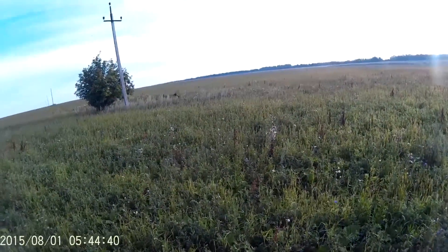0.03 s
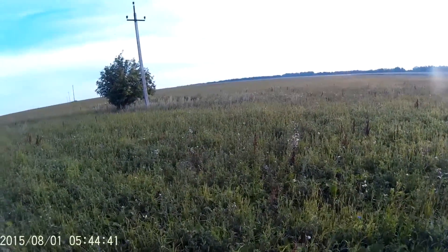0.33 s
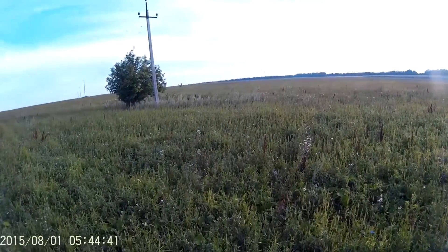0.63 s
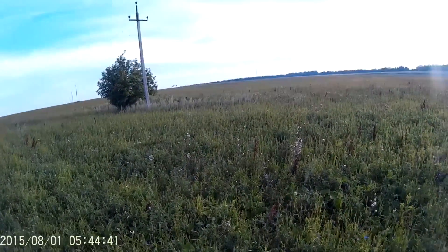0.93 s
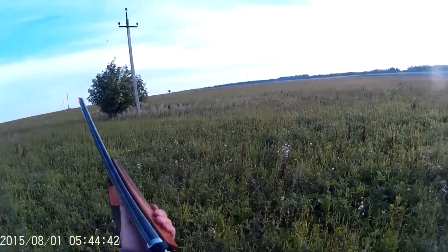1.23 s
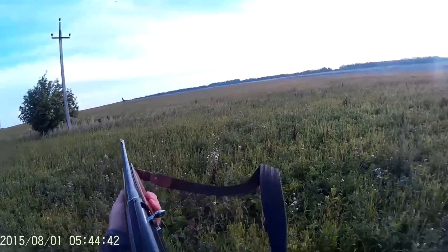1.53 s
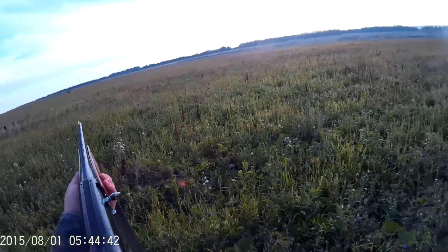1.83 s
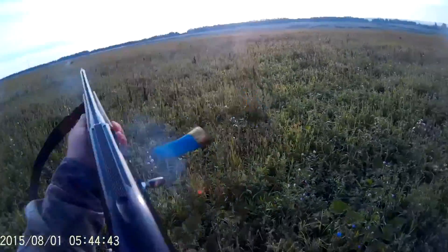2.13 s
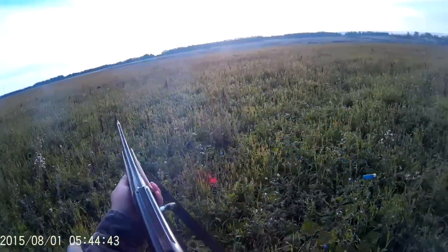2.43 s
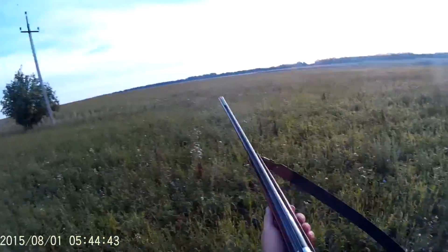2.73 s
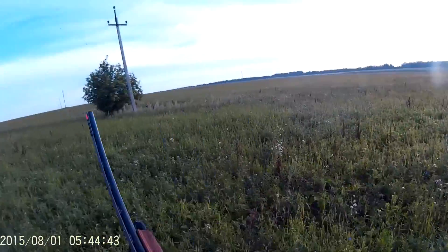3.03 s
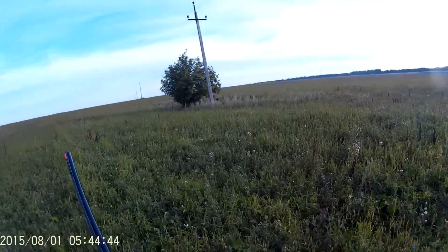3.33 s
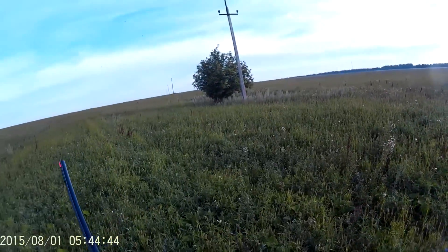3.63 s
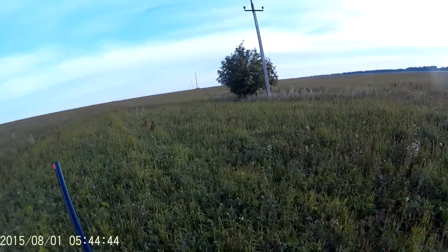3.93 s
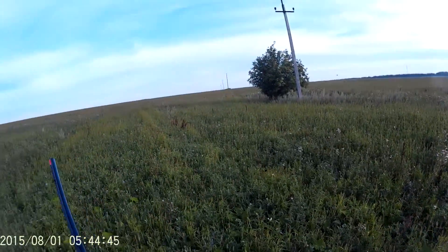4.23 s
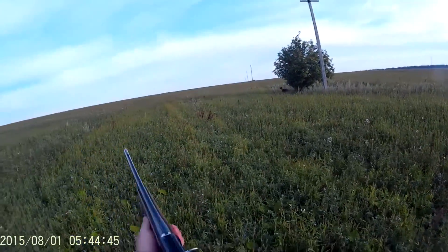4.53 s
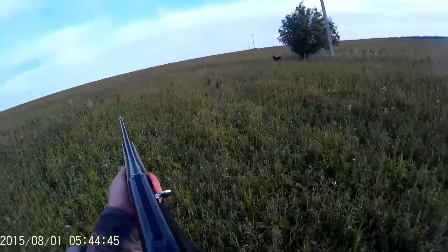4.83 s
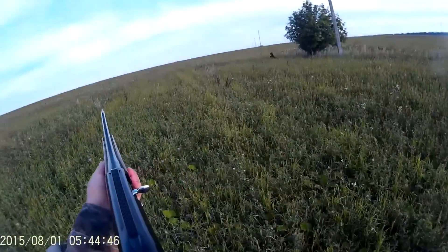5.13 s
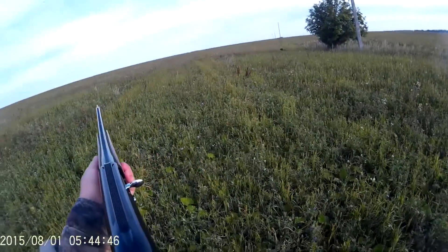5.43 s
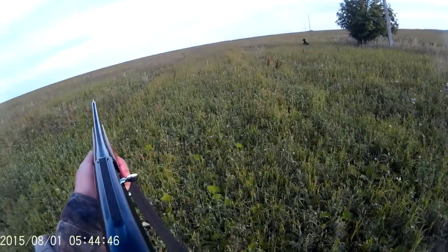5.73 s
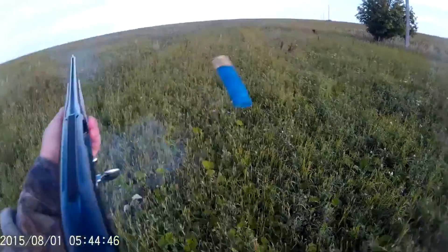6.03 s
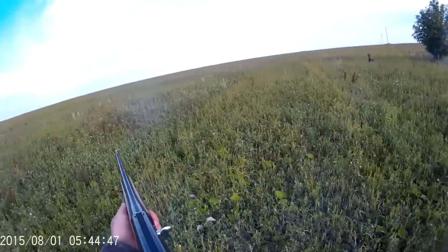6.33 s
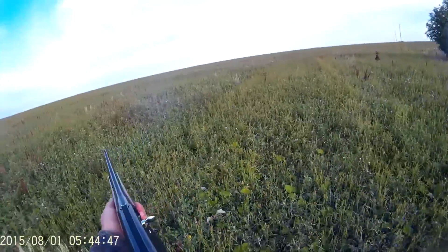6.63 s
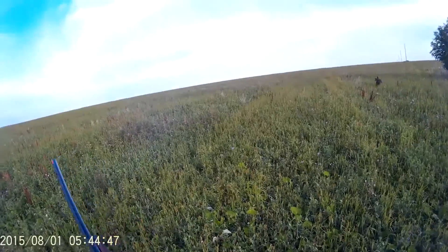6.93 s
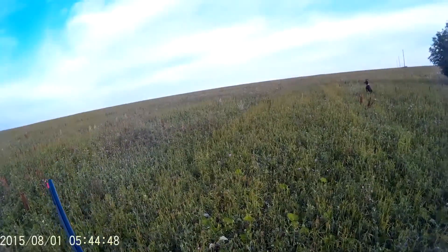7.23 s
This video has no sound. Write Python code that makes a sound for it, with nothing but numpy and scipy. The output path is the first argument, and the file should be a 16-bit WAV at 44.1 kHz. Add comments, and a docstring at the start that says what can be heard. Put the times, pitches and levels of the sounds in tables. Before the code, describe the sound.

Two loud, close shotgun blasts about four seconds apart in an open field, each followed by a quick metallic bolt clack.

```python
"""Two shotgun shots in a meadow

Open grass, still air; a small camera on the shooter's head, about a metre behind a self-loading gun.
Each muzzle blast rings the camera case and overloads the microphone. Grass and field scatter a short
tail, the recoil thumps, and the bolt clatters shut an eighth of a second later. Around the shots,
close in: soft bumps of the camera and brushing sleeves, over a faint rumble and hiss."""
import sys
import numpy as np
from scipy import signal
from scipy.fft import rfft, irfft
from scipy.io import wavfile

SR = 44100
rng = np.random.default_rng(int(sys.argv[2]) if len(sys.argv) > 2 else 0)


def to_wav(sig):
    """Store sig (one row per channel, or 1-D mono) as 16-bit WAV at the path in sys.argv[1].

    Samples outside -1..1 are clipped; the rate is SR.
    """
    pcm = np.clip(np.atleast_2d(sig), -1, 1) * 32767
    pcm = np.round(pcm).astype(np.int16)
    wavfile.write(sys.argv[1], SR, pcm.T)  # frames by channels


N = 329427
T = np.arange(N) / SR


# The shots, from just behind the gun: (time [s], blast [dB], bark centre [Hz], crack centre [Hz],
# scatter [dB], recoil thump [dB], shudder [dB])
GUNSHOTS = [(2.0534, 4, 1551, 5962, -20, -24.5, -9), (5.9397, 2, 1216, 3884, -19.5, -18, -5.5)]
def shotgun(push_ms=.7, lead_s=.0048, jolt_db=-13, jolt_hz=1280, hiss_db=-32, kick_s=.0043):
    """Firing jolts the gun while the charge is still in the barrel; then come blast, scatter and recoil."""
    out, t = np.zeros(N), T[:SR]
    for s, blast_db, bark_hz, crack_hz, scatter_db, thump_db, shudder_db in GUNSHOTS:
        jolt = undb(jolt_db) * resonate(shock(t, push_ms), jolt_hz, width_hz=220)
        hiss = undb(hiss_db) * colour(noise(len(t)) * fade(t, t60=.06), STEEL_SCRAPE)
        add(out, s - lead_s, jolt + hiss)
        add(out, s, undb(blast_db) * muzzle(t, push_ms, bark_hz, crack_hz))
        add(out, s, undb(scatter_db) * meadow(t))
        add(out, s + kick_s, recoil(t, thump_db, shudder_db))
    return out


def muzzle(t, push_ms, bark_hz, crack_hz, ahead_s=.00075, ground_s=.0063, low_cut_hz=160):
    """A small snap of gas runs ahead of the charge; the blast swings the other way, barks and cracks."""
    snap = undb(-14) * shock(t, push_ms=.3)
    blast = -shock(t - ahead_s, push_ms)
    bounce = -undb(-17) * shock(t - ahead_s - ground_s, push_ms)
    bounce = colour(bounce, [(1500, -1), (6000, -14)])  # the ground bounce loses treble in the grass
    wave = snap + blast + bounce
    bark = undb(-1) * resonate(wave, bark_hz, width_hz=1000)
    crack = undb(1) * resonate(wave, crack_hz, width_hz=600)
    return signal.sosfilt(signal.butter(1, low_cut_hz, "high", fs=SR, output="sos"), wave + bark + crack)


def shock(t, push_ms):
    """Blast wave: a sudden overpressure that falls through zero into a longer suction."""
    age = np.maximum(t, 0) * 1000 / push_ms
    return (t >= 0) * (1 - age) * np.exp(-age)


# Echoes off the grass nearby and off the field farther out: (frequency [Hz], level [dB])
NEAR_GRASS = [(100, -7.5), (300, -1), (550, 1.5), (850, 3.5), (1100, -1), (1500, 2), (2100, 1.5),
              (3700, -3.5), (5500, -8.5), (7000, -13.5), (11000, -16.5), (13000, -28.5), (16000, -36.5)]
DISTANT_FIELD = [(60, 10.5), (200, 12), (450, 10.5), (900, 2), (2000, 1), (4000, -7), (7000, -14),
                 (11000, -19.5), (14000, -34.5)]
def meadow(t, near_t60=.125, far_t60=.5, far_db=-23, build_s=.002453):
    """Grass close by throws back a bright spray of echoes; the field beyond answers longer and duller."""
    near = colour(grains(len(t), spread_db=2.5) * fade(t, near_t60), NEAR_GRASS)
    far = colour(grains(len(t), spread_db=1.5) * fade(t, far_t60), DISTANT_FIELD)
    return (near + undb(far_db) * far) * (1 - np.exp(-t / build_s))


# The recoil's shudder at the head mount: (frequency [Hz], level [dB])
MOUNT_SHUDDER = [(15, -2), (35, 2.5), (70, -0.5), (105, -18.5), (220, -18.5), (500, -44.5), (2000, -80)]
def recoil(t, thump_db, shudder_db, swing_hz=55, shudder_t60=.47):
    """The kick swings the camera; it shudders on as the shooter settles."""
    shudder = colour(noise(len(t)), MOUNT_SHUDDER) * fade(t, shudder_t60)
    return undb(shudder_db) * shudder - undb(thump_db) * rock(t, swing_hz, rise_s=.0071)


# The bolt slams home, just in front of the microphone: (time [s], level [dB], treble [dB])
BOLT_SLAMS = [(2.172, -34, 2), (6.0600, -32.5, 0.5)]
# Shell rides up the ramp, bolt slams, lock drops in, gun settles:
# (time from the slam [s], level [dB], treble [dB])
BOLT_STROKE = [(-.006, -5, -3), (0, -1, 1), (0.0112, -.5, -6), (.083, -23, -12)]
# Lone clinks: the ejector striking the shell, then the shell latch: (time [s], level [dB], treble [dB], latch
# ring [dB])
LONE_CLINKS = [(2.1048, -34.5, -10.5, 13.5), (2.2170, -47.5, 0, 0), (6.1263, -41, -2.5, 10)]
def gun_action():
    """The bolt makes the same stroke after each shot and shakes the latch; the ejector and the latch also clink
    by themselves."""
    out = np.zeros(N)
    for s, db, treble_db in BOLT_SLAMS:
        for after_s, knock_db, tilt_db in BOLT_STROKE:
            clack = knock(scrape_s=.0067, treble_db=treble_db + tilt_db, latch_db=-6)
            add(out, s + after_s, undb(db + knock_db) * clack)
    for s, db, treble_db, latch_db in LONE_CLINKS:
        add(out, s, undb(db) * knock(scrape_s=.003, treble_db=treble_db, latch_db=latch_db))
    return out


# Steel scraping on steel, close up: (frequency [Hz], level [dB])
STEEL_SCRAPE = [(100, -7), (600, -6), (1000, 0), (1500, -5.5), (2200, -2.5), (3700, -8.5), (6000, -13.5),
                (11000, -18.5), (13000, -32), (16000, -39.5)]
# Modes of the receiver and barrel, and of the small shell latch: (frequency [Hz], t60 [s], level [dB])
RECEIVER_MODES = [(1073, 0.037, 0.5), (1530, 0.045, 2), (2600, 0.044, 8), (2906, .04, 5), (3910, .04, 1),
                  (4560, .03, 6), (5754, .03, 4)]
LATCH_MODES = [(3070, .02, 1), (3860, 0.023, 2), (7430, .015, 5.5)]
def knock(scrape_s, treble_db, latch_db, receiver_db=-2, field_db=-22, field_t60=.14, bite_s=.00051):
    """A brief gritty scrape with a faint tail rings the receiver and the latch."""
    t = T[:SR // 4]
    envelope = np.exp(-(t / scrape_s) ** 4) + undb(field_db) * fade(t, field_t60)
    force = grains(len(t), spread_db=1.3) * envelope * (1 - np.exp(-t / bite_s))
    contact = colour(colour(force, STEEL_SCRAPE), [(1500, 0), (6000, treble_db)])
    receiver = undb(receiver_db) * ring(contact, RECEIVER_MODES)
    latch = undb(latch_db) * ring(contact, LATCH_MODES)
    return contact + receiver + latch


# The camera rocks on its strap as the shooter shifts weight: (time [s], level [dB], rise [s])
CAMERA_BUMPS = [(0.269, -47.5, 0.038), (.84, -56, .05), (1.075, -48.5, 0.016), (1.175, -48, 0.02),
                (4.624, -38.5, 0.017), (4.70, -51.5, 0.034)]
# The arms raise or lower the gun: (mid time [s], sleeve [dB], treble [dB], camera sway [dB])
ARM_SWINGS = [(1.5, -75, -1, -62), (2.613, -80.5, 15.5, -79.5), (4.76, -71, -7, -64)]
# The sling scuffs, a shell drops into the grass: (time [s], level [dB], half length [s], treble [dB])
SHORT_SCUFFS = [(1.571, -58.5, .004, -3), (2.524, -74, .005, 17), (4.738, -75, .018, 15)]
def handling(strap_hz=31.7, sway_width_hz=16, drag_db=-56, drag_db_per_db=.3, drag_lag_s=.08):
    """Bumps rock the camera and drag the jacket; swings brush the sleeves and sway the camera."""
    out, drag = np.zeros(N), np.zeros(N)
    for s, db, rise_s in CAMERA_BUMPS:
        add(out, s, undb(db) * rock(T[:SR], strap_hz, rise_s))
        drag += undb(drag_db + drag_db_per_db * db) * swell(s + drag_lag_s, half_s=.066)
    sway = resonate(resonate(noise(), strap_hz, sway_width_hz), strap_hz, sway_width_hz)
    for s, sleeve_db, treble_db, sway_db in ARM_SWINGS:
        out += undb(sleeve_db) * brush(swell(s, half_s=.16), treble_db)
        out += undb(sway_db) * swell(s, half_s=.28) * sway / np.std(sway)
    for s, db, half_s, treble_db in SHORT_SCUFFS:
        out += undb(db) * brush(swell(s, half_s), treble_db)
    return out + brush(drag, treble_db=-3.5)


# Jacket cloth just below the microphone: (frequency [Hz], level [dB])
JACKET_RUB = [(100, 8), (300, 19.5), (800, 6), (1400, -7), (2000, -4.5), (4000, -24), (12000, -19.5)]
def brush(pressure, treble_db):
    """Cloth rubbing on cloth, as loud as it is pressed."""
    rub = colour(grains(N, spread_db=3.5) * pressure, JACKET_RUB)
    return colour(rub, [(500, 0), (1800, treble_db), (6000, 0)])


# The quiet meadow and the microphone's noise floor: (frequency [Hz], level [dB])
NOISE_FLOOR = [(12, -30.5), (20, 0), (37, 1), (54, -4), (129, -3.5), (315, -7.5), (416, -10.5),
               (505, -11.5), (686, -15), (811, -15.5), (906, -17), (1630, -22), (11100, -28),
               (13900, -30.5), (15500, -35)]
def still_air(level_db=-63.5):
    """A faint even rumble under the microphone's hiss."""
    air = colour(noise(), NOISE_FLOOR)
    return undb(level_db) * air / np.std(air)


# Resonances of the case around the microphone: (frequency [Hz], width [Hz], level [dB])
CASE_MODES = [(893, 33, -3.5), (1427, 240, 11.5), (1800, 200, 8), (2136, 140, 11), (2994, 170, 10),
              (3667, 120, 13), (4060, 130, 6.5), (4620, 160, 4), (5880, 350, -1), (10230, 1100, 5.5)]
def camera_case(x):
    """The case rings with the sound that passes through it."""
    return x + sum(undb(db) * resonate(x, hz, width_hz) for hz, width_hz, db in CASE_MODES)


def microphone(x, ceiling=.9, null_hz=3340, treble_hz=12300):
    """The capsule flattens the blasts, is deaf to one narrow band and rolls off the treble."""
    clipped = x / (1 + (x / ceiling) ** 8) ** (1 / 8)
    notched = clipped - resonate(clipped, null_hz, width_hz=200)
    return signal.sosfiltfilt(signal.butter(2, treble_hz, fs=SR, output="sos"), notched)


def undb(db):
    """Decibels to gain."""
    return 10 ** (np.asarray(db) / 20)


def noise(size=N):
    """White noise of rms 1."""
    return rng.standard_normal(size)


def grains(size, spread_db):
    """Dense tiny impacts of very unequal strength, rms 1."""
    x = noise(size) * undb(spread_db * rng.exponential(size=size))
    return x / np.std(x)


def fade(t, t60):
    """Exponential decay that loses 60 dB in t60 seconds."""
    return np.exp(-np.log(1000) * t / t60)


def swell(s, half_s):
    """A smooth rise and fall around time s."""
    return np.exp(-((T - s) / half_s) ** 2)


def rock(t, hz, rise_s):
    """A low swing whose envelope peaks at 1 after rise_s and dies away."""
    return np.sin(2 * np.pi * hz * t) * t / rise_s * np.exp(1 - t / rise_s)


def resonate(x, hz, width_hz):
    """One resonance, gain 1 at its centre."""
    return signal.lfilter(*signal.iirpeak(hz, hz / width_hz, fs=SR), x + 1e-18)


def ring(x, modes):
    """Metal ringing in its modes: the longer the decay, the narrower the resonance."""
    return sum(undb(db) * resonate(x, hz, np.log(1000) / (np.pi * t60)) for hz, t60, db in modes)


def colour(x, points, size=8192):
    """Causal filter through points of (frequency [Hz], level [dB])."""
    hz, db = np.transpose(points)
    grid = np.maximum(np.fft.rfftfreq(size, 1 / SR), 1)
    gain = undb(np.interp(np.log(grid), np.log(hz), db))
    cepstrum = irfft(np.log(gain))
    cepstrum[1:size // 2] *= 2  # fold onto positive time for minimum phase
    cepstrum[size // 2 + 1:] = 0
    impulse = irfft(np.exp(rfft(cepstrum)))
    return signal.fftconvolve(x, impulse)[:len(x)]


def add(out, s, x):
    """Mix x into out from time s on."""
    i = int(round(s * SR))
    out[i:i + len(x)] += x[:N - i]


def scene():
    """Gun and shooter through the head-worn camera, in mono, over the quiet field."""
    at_camera = shotgun() + gun_action() + handling()
    return (microphone(camera_case(at_camera)) + still_air())[None]


def record(dry, top_hz=15500):
    """A steep low-pass cuts the highest treble."""
    return signal.sosfiltfilt(signal.ellip(8, .05, 50, top_hz, fs=SR, output="sos"), dry)


dry = scene()
out = record(dry)
to_wav(out)
```